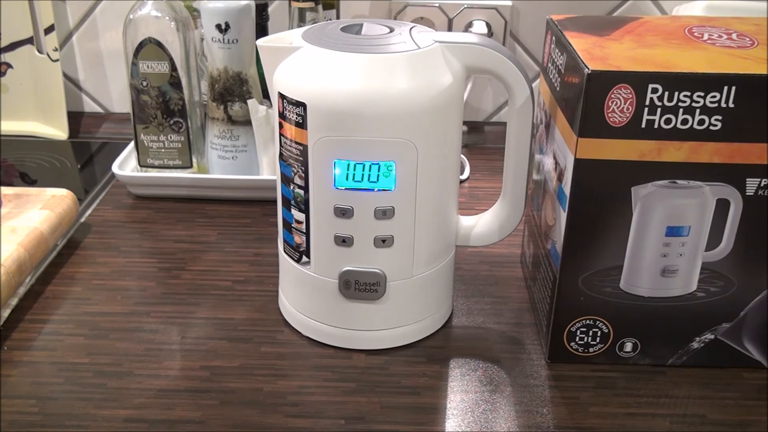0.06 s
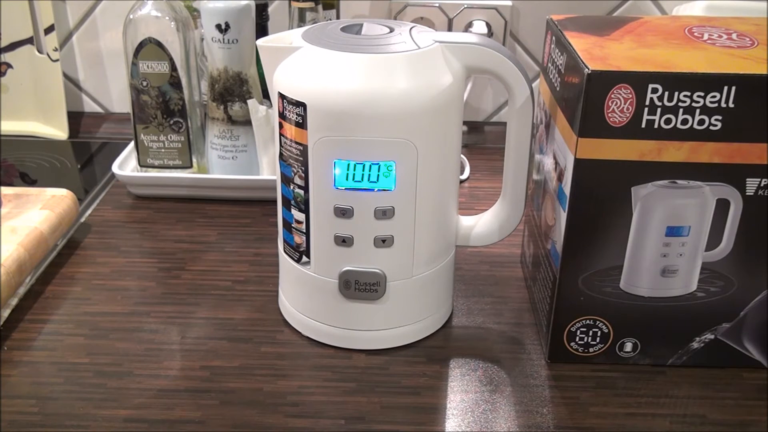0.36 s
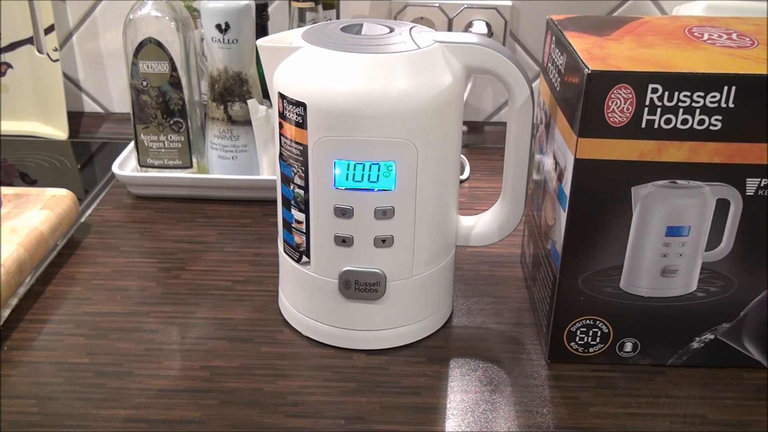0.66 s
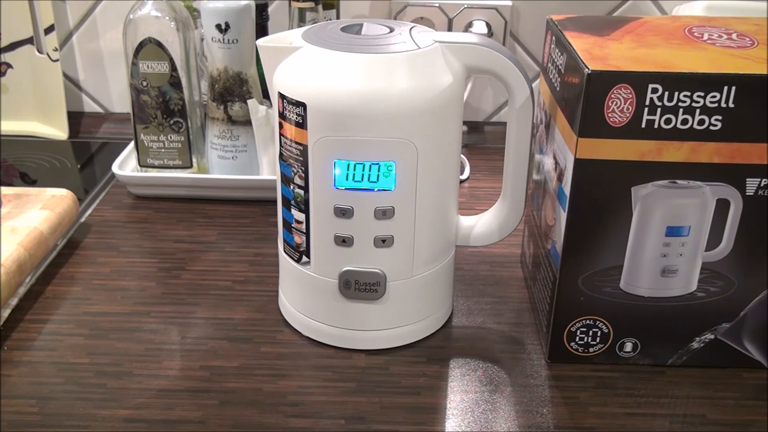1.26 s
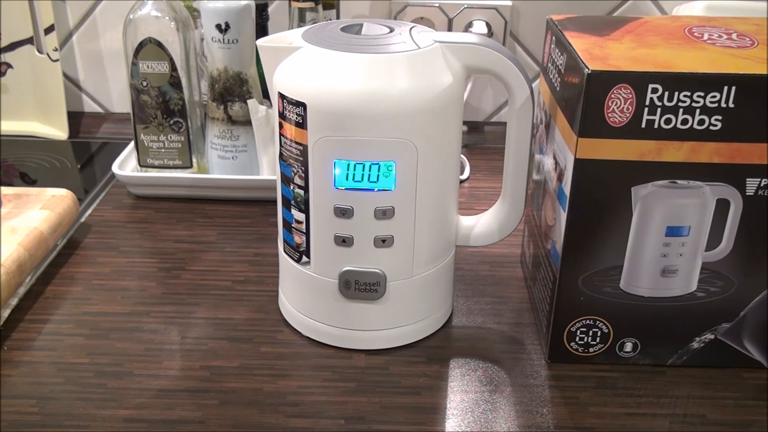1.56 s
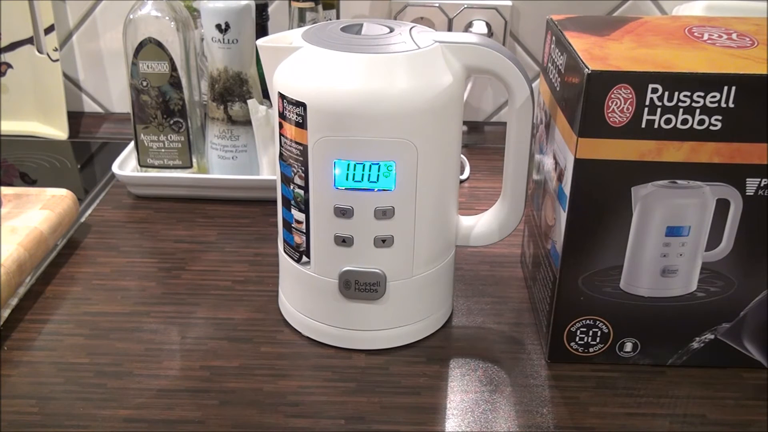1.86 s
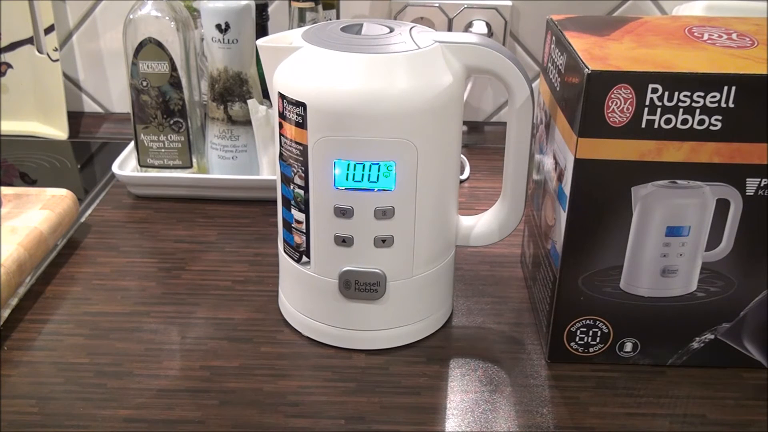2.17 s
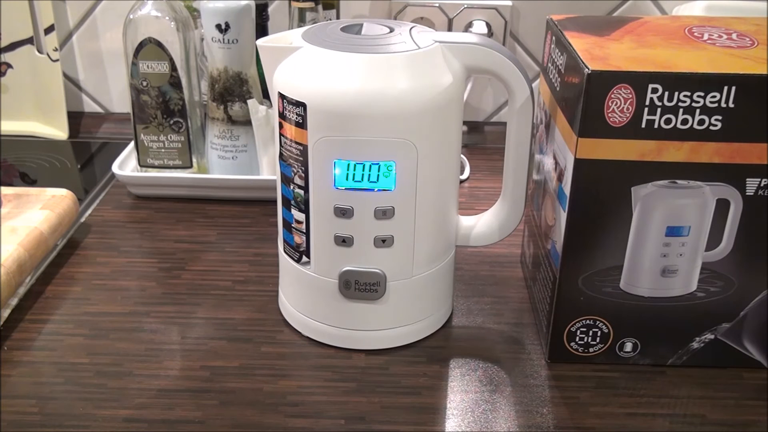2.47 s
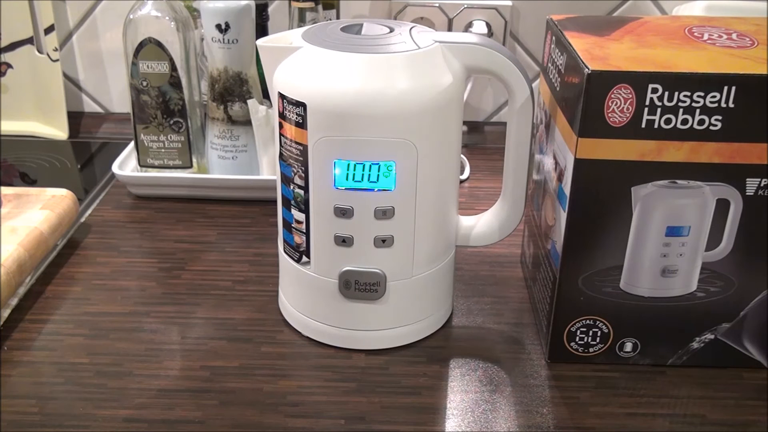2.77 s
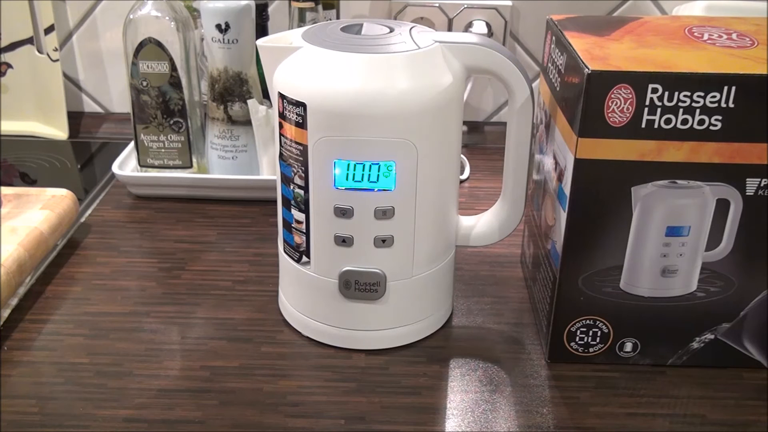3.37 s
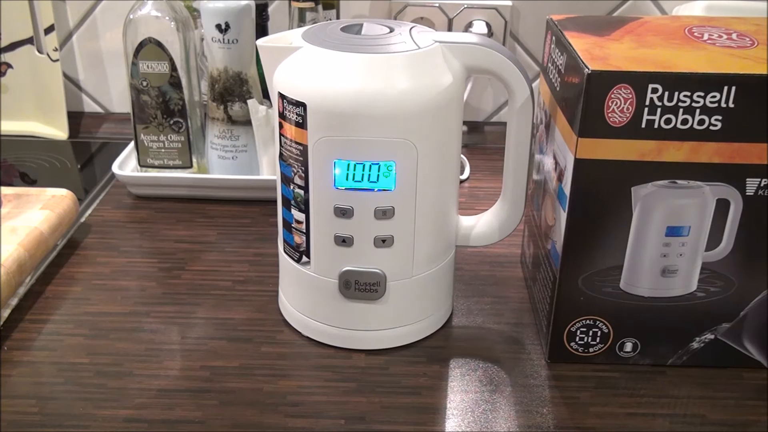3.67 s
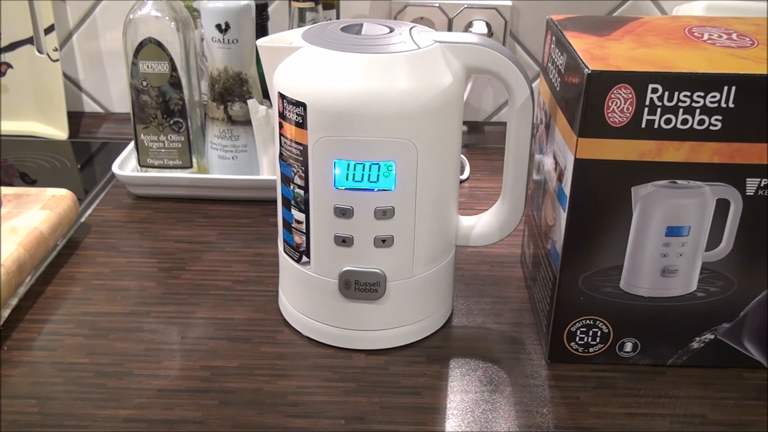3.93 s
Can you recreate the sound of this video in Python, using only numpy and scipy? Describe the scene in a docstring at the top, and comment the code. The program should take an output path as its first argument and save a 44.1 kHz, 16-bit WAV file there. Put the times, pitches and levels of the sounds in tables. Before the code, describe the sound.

An electric kettle heats water with a steady, slowly growing roar and faint fizz.

```python
"""Electric kettle before the boil

Thousands of tiny steam bubbles a second collapse on the hot base and merge into a slowly growing roar.
They ring the water and the jug; the smallest add a fizz, and the base rumbles faintly on the worktop.
The sound is close and nearly mono, with a little kitchen around it."""
import sys
import numpy as np
from scipy import signal
from scipy.fft import rfft, irfft, next_fast_len
from scipy.io import wavfile

SR = 44100
rng = np.random.default_rng(int(sys.argv[2]) if len(sys.argv) > 2 else 0)


def bounce(signal):
    """Save signal as a 16-bit WAV file at the path given by the first command-line argument."""
    frames = np.transpose(np.atleast_2d(signal))
    limited = np.clip(frames, -1, 1)
    pcm = np.round(limited * 32767).astype(np.int16)
    wavfile.write(sys.argv[1], SR, pcm)


N = 176400
COLLAPSES_PER_S = 16000


def from_db(db):
    """Decibels to gain."""
    return 10 ** (np.asarray(db) / 20)


def unit_power(x):
    """Scale to an RMS of 1."""
    return x / np.sqrt(np.mean(x ** 2) + 1e-20)


def envelope(points):
    """Draw straight lines through (t/s, value) points, one value a sample."""
    return np.interp(np.arange(N) / SR, *np.transpose(points))


def drift(rate_hz):
    """Smooth random wander with a spread of about 1."""
    hop, warm_up = 40, 2000
    pole = np.exp(-2 * np.pi * rate_hz * hop / SR)
    noise = rng.standard_normal(N // hop + warm_up + 2)
    slow = signal.lfilter([1], [1, -2 * pole, pole * pole], noise)[warm_up:]
    return np.interp(np.arange(N) / hop, np.arange(len(slow)), unit_power(slow))


def colour(x, eq):
    """Minimum-phase EQ through (f/Hz, gain/dB) points."""
    hz, db = np.transpose(eq)
    size = next_fast_len(N + SR // 2) // 2 * 2
    bins_hz = np.maximum(np.arange(size // 2 + 1) * SR / size, 1)
    gain = from_db(np.interp(np.log(bins_hz), np.log(hz), db))
    cepstrum = irfft(np.log(gain))
    cepstrum[1:size // 2] *= 2  # folded forward, so nothing rings ahead of a click
    cepstrum[size // 2 + 1:] = 0
    return irfft(rfft(x, size) * np.exp(rfft(cepstrum)))[:N]


def resonate(x, hz, width_hz):
    """One resonance with gain 1 at its peak."""
    radius = np.exp(-np.pi * width_hz / SR)
    feedback = [1, -2 * radius * np.cos(2 * np.pi * hz / SR), radius ** 2]
    return signal.lfilter((1 - radius ** 2) / 2 * np.array([1, 0, -1]), feedback, x)


def collapses(per_s):
    """Steam bubbles implode as random clicks, many small and a few large; unit power."""
    size_db = 2.0 * np.minimum(rng.exponential(1, N), 4)
    polarity = rng.choice([-1, 1], N)
    hits = rng.random(N) < per_s / SR
    return unit_power(from_db(size_db) * polarity * hits)


def reflections(x, t60_s=0.11, first_echo_s=0.003):
    """Dense, quickly dying echoes off tiles and worktop."""
    t = np.arange(SR // 2) / SR
    echoes = rng.standard_normal(len(t)) * from_db(-60 * t / t60_s) * (t > first_echo_s)
    return signal.fftconvolve(x, echoes / np.linalg.norm(echoes))[:N]


def kitchen(direct):
    """The room returns a faint centred reverb and scatters a touch of stereo width."""
    # reflections reaching both sides alike, against the direct sound: f/Hz, level/dB
    mid_eq = [(300, -21), (900, -18.5), (1600, -15), (3000, -16), (9000, -13.5)]
    # scatter in opposite polarity left and right, against the direct sound: f/Hz, level/dB
    side_eq = [(30, -13), (65, -14), (140, -42), (220, -23), (380, -56), (560, -31), (750, -33),
               (1200, -20), (3000, -17), (4500, -19.5), (6400, -12), (9000, -21.5), (11500, -34),
               (13000, -30)]
    mid = colour(reflections(direct), mid_eq)
    side = colour(reflections(direct), side_eq)
    return mid + side * np.array([[1], [-1]])


def base_rumble():
    """Collapses shake the base on the worktop, harder as the boil nears."""
    # drive on the base: t/s, level/dB
    rumble_drive = [(0, -52), (.1, -57), (.2, -50.5), (1.9, -50.5), (2.7, -47.5), (4, -45.5)]
    # low-end tone of the base on the worktop: f/Hz, gain/dB
    rumble_eq = [(20, -22), (50, -11.5), (80, -13), (105, -2.5), (155, 5.5), (190, -0.5), (250, -5),
                 (330, -8), (600, -31)]
    return colour(collapses(COLLAPSES_PER_S) * from_db(envelope(rumble_drive)), rumble_eq)


def fizz():
    """The smallest bubbles add a bright, slightly fluttering sizzle."""
    # drive, stepping up as the smallest bubbles multiply: t/s, level/dB
    fizz_drive = [(0, -55), (.58, -53.5), (.66, -52.5), (1.38, -52.6), (1.46, -51), (2.05, -50.6),
                  (2.65, -50), (3.1, -50.2), (3.5, -49.5), (4, -49.4)]
    # tone of the smallest bubbles: f/Hz, gain/dB
    fizz_eq = [(3000, -40), (5500, 0.5), (6400, -4.5), (7200, 1), (7700, -.5), (8200, 2.5), (8900, .5),
               (9500, -3), (9900, -3.5), (11200, -17), (11650, -9.5), (12300, -22), (14500, -43)]
    clicks = collapses(per_s=11000)
    flutter_db = 0.3 * drift(rate_hz=20)
    return colour(clicks * from_db(envelope(fizz_drive) + flutter_db), fizz_eq)


def swarms():
    """Larger bubbles collapse together in short, bell-shaped swells; returns dB."""
    # swarms, and one slight dip: centre t/s, length/s, gain/dB
    swells = [(0.664, 0.032, 5.5), (.73, 0.036, 8.5), (.83, 0.097, 3), (1.02, 0.079, 2.5), (1.424, .1, 1.5),
              (1.51, 0.051, 3), (1.76, 0.04, 5.5), (1.89, 0.061, 4), (2.04, 0.036, 8), (2.16, 0.11, 2.5),
              (2.34, 0.072, 4.5), (2.59, 0.1, 4), (2.715, 0.071, 2), (2.816, 0.055, 4.5),
              (2.945, 0.067, 4.5), (3.08, 0.033, 10.5), (3.134, 0.032, 6), (3.21, 0.027, -1),
              (3.368, 0.046, 7), (3.443, 0.039, 7), (3.68, 0.096, 5), (3.776, 0.079, 6), (3.92, 0.087, 5.5)]
    t = np.arange(N) / SR
    return sum(db * np.exp(-(2 * (t - centre) / length) ** 2) for centre, length, db in swells)


def jug_ring(clicks, heat_db):
    """Each collapse strikes every mode with a random strength, as it lands anywhere on the base."""
    # resonances of water and jug: f/Hz, width/Hz, peak gain/dB
    modes = [(311, 7.9, -15.5), (364.7, 12.8, -2.5), (410, 10.4, -6.5), (430.7, 10.6, 1), (447.9, 9.2, 5.5),
             (480, 19, -0.5), (503, 7.2, 1.5), (525, 14.3, 4), (541.5, 11.7, -1), (559.5, 8.8, -4),
             (590.4, 8, 4.5), (597, 6.4, 5), (624, 17, 0.5), (646, 15, -2), (661.3, 10, 5), (709, 16, -5.5),
             (739.4, 14, -1), (795.6, 9.9, 1), (820.7, 11.6, 2), (949, 20.6, -0.5), (978, 11, -2),
             (1106, 14.4, 1.5), (1143, 19, -6.5), (1202, 21, -1.5), (1275, 20.4, 2), (1317, 11.6, 6.5),
             (1411, 20, .5), (1426, 10.4, 6), (1480, 10, -1), (1546, 9.1, 5.5), (1616, 36, -1),
             (1706, 19, -2), (1846, 8.2, 3), (1888, 8.1, -0.5), (2072, 30, 0), (2376, 25, -5),
             (2638, 63, -2), (2747, 24, -0.5), (3045, 20, -5.5), (3330, 33, -7), (3470, 27, -4),
             (3890, 30, -11), (3955, 17, -10), (4630, 320, -12.5)]
    # bubbles grow with the heat, so the lowest modes gain most: f/Hz, slope/(dB per dB of heat)
    heat_slopes = [(450, 1.8), (600, 1.05), (800, 1.2), (1100, 1.5), (2000, 1.3)]
    water_below_hz, low_cut_hz = 610, 296  # the jug is too small to radiate below the low cut
    swarm_db = swarms()
    ring = np.zeros(N)
    for hz, width_hz, peak_db in modes:
        flutter_db = 0.14 * drift(rate_hz=10.3)
        swell_db = swarm_db * (hz < water_below_hz)  # swarms drive only the water's low modes
        growth_db = np.interp(hz, *np.transpose(heat_slopes)) * heat_db
        strikes = clicks * rng.standard_normal(N)
        ring += resonate(strikes * from_db(peak_db + flutter_db + swell_db + growth_db), hz, width_hz)
    return signal.sosfilt(signal.butter(4, low_cut_hz, "high", fs=SR, output="sos"), ring)


def roar(clicks, heat_db):
    """The collapses merge into a broad rush that rides the heat."""
    # tone through the jug wall: f/Hz, gain/dB
    wall_eq = [(200, -39.5), (280, -37), (305, -30), (345, -20), (430, -16), (600, -12), (700, -12),
               (880, -11.5), (1050, -10), (1230, -4.5), (1350, -2.5), (1650, -3.5), (2050, -3),
               (2250, -6.5), (2800, -6), (3500, -7.5), (4200, -13.5), (5200, -24), (6500, -31.5),
               (9000, -47.5)]
    return colour(clicks * from_db(heat_db), wall_eq)


def kettle():
    """One stream of collapses feeds roar and ring; fizz and rumble rise alongside."""
    # heat, as strength of the collapses, used relative to its mean: t/s, level/dB
    heat = [(0, -43.5), (.58, -43.5), (.69, -42), (1.15, -43), (1.5, -42), (2.4, -42), (3.15, -41),
            (3.6, -41.5), (3.8, -41), (4, -41.5)]
    trend_db = envelope(heat)
    surge_db = 0.45 * drift(rate_hz=26)
    heat_db = trend_db - trend_db.mean() + surge_db
    clicks = collapses(COLLAPSES_PER_S)
    body = roar(clicks * from_db(-30), heat_db)
    ring = jug_ring(clicks * from_db(-30.5), heat_db)
    return body + ring + fizz() + base_rumble()


def scene():
    """The kettle in the centre, the room faintly around it."""
    direct = kettle()
    return direct + kitchen(direct)


def record(dry):
    """A steep low-pass takes off the very top."""
    cutoff_hz = 14600
    return signal.sosfilt(signal.ellip(10, .1, 70, cutoff_hz, fs=SR, output="sos"), dry)


dry = scene()
out = record(dry)
bounce(out)
```